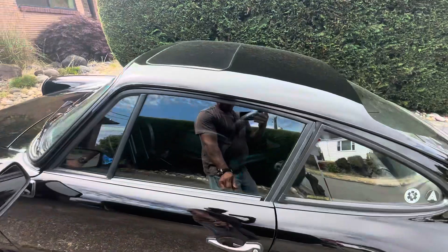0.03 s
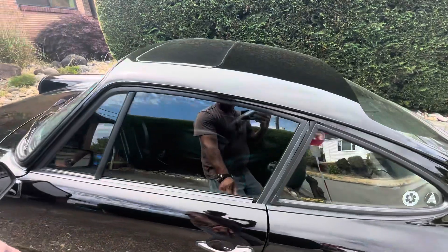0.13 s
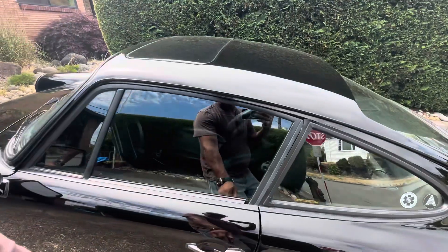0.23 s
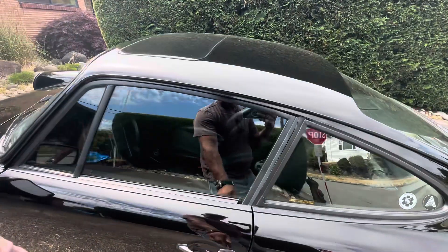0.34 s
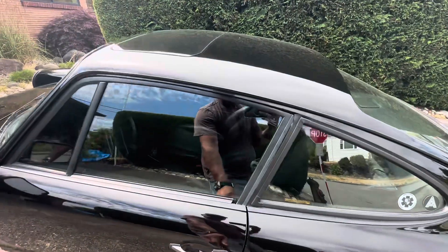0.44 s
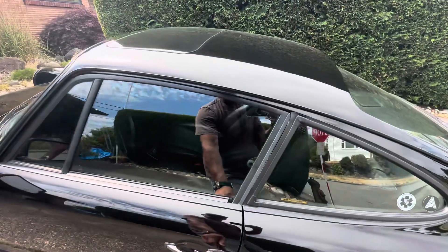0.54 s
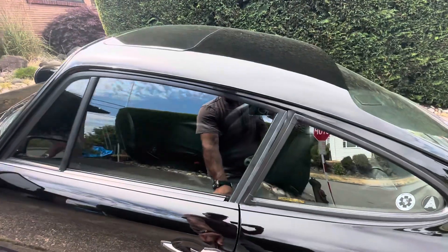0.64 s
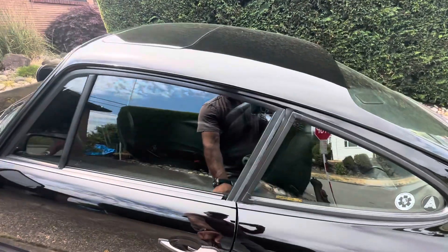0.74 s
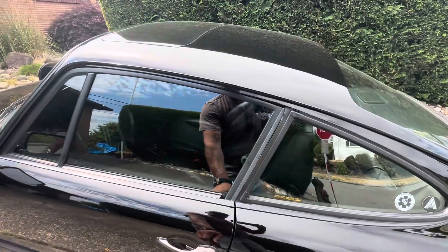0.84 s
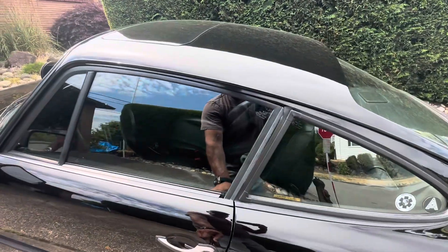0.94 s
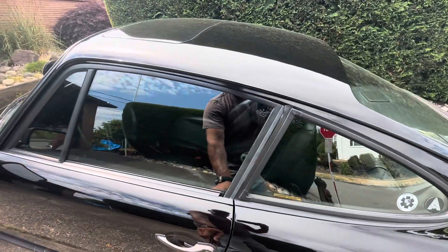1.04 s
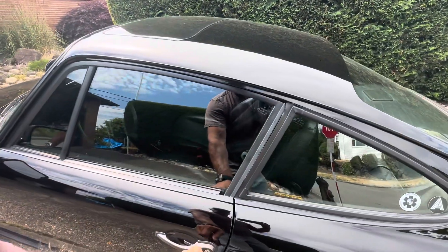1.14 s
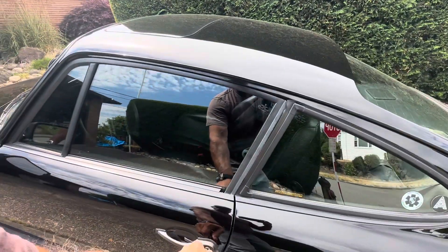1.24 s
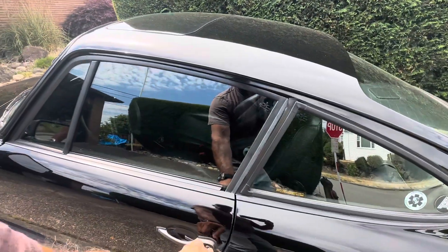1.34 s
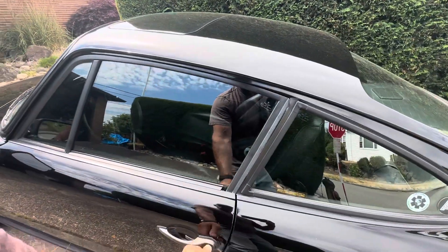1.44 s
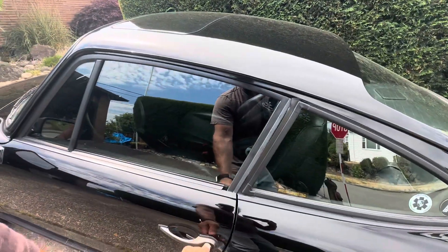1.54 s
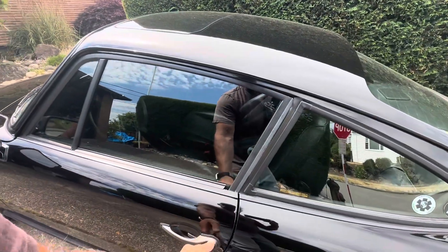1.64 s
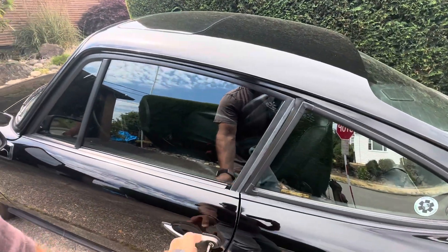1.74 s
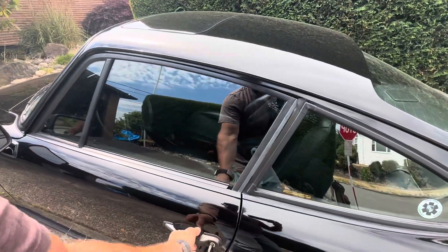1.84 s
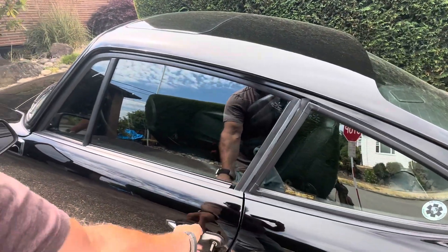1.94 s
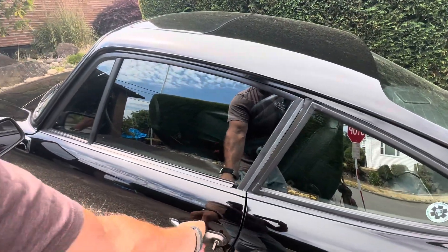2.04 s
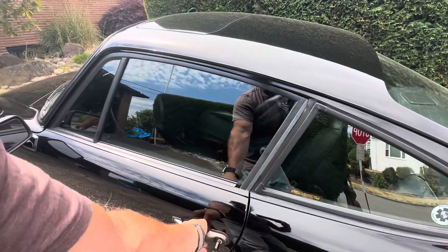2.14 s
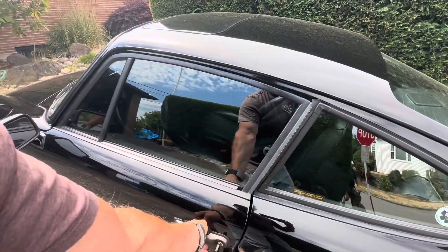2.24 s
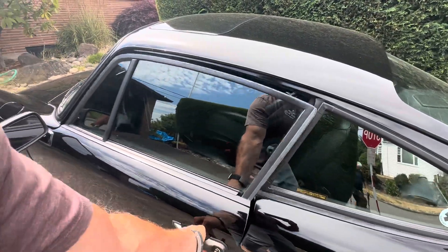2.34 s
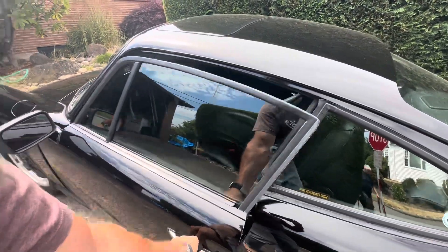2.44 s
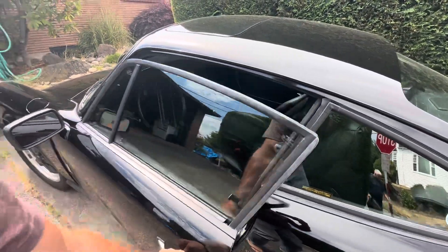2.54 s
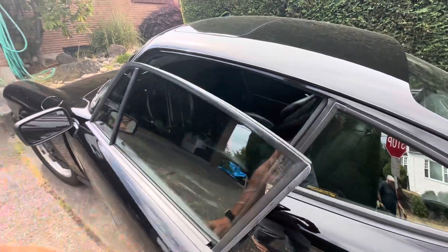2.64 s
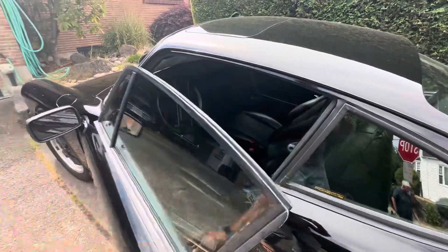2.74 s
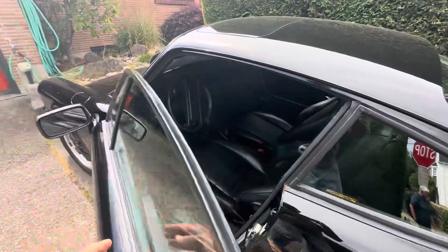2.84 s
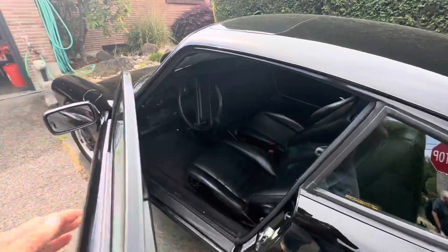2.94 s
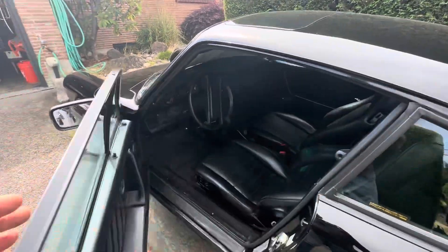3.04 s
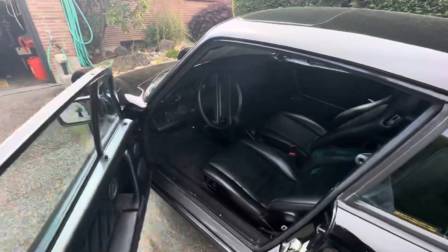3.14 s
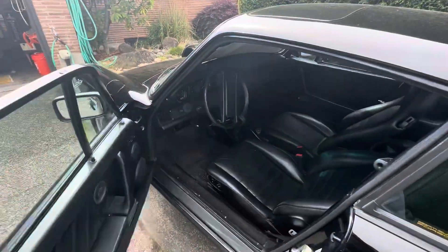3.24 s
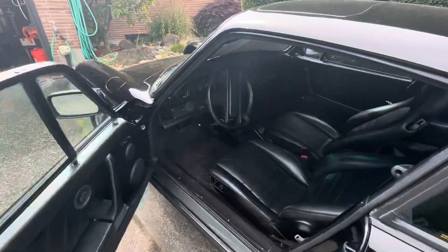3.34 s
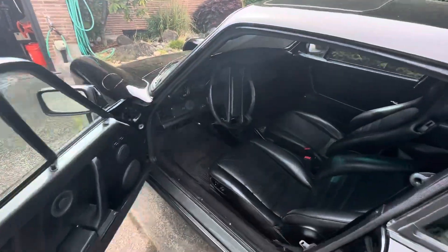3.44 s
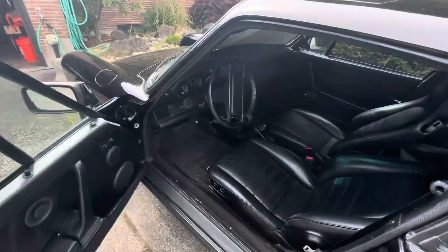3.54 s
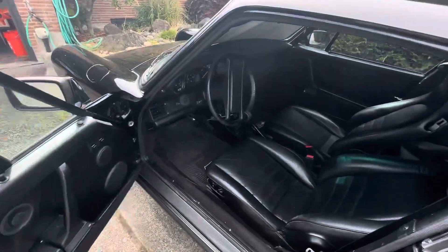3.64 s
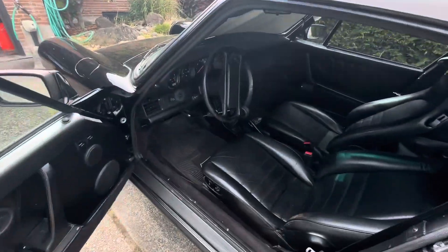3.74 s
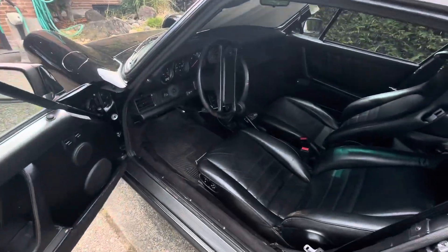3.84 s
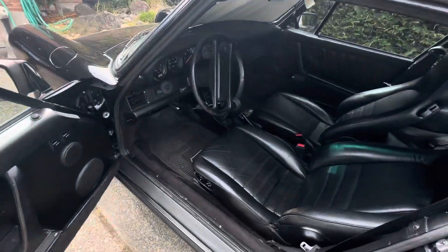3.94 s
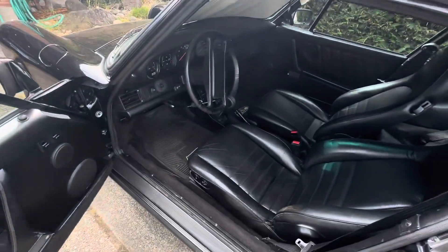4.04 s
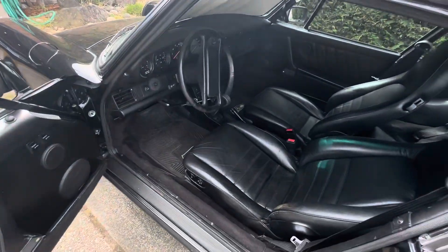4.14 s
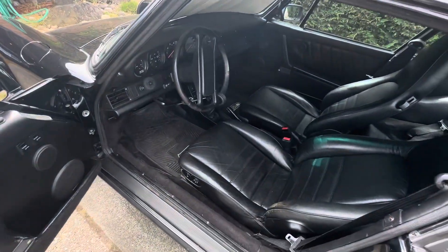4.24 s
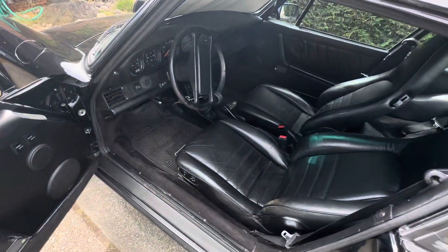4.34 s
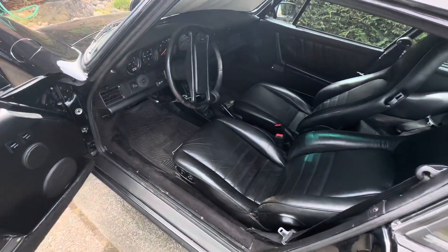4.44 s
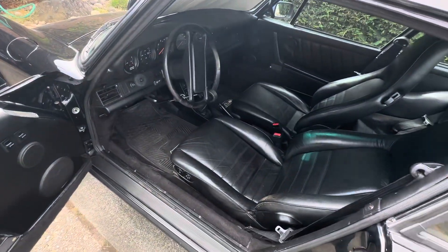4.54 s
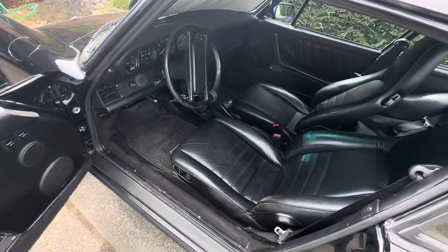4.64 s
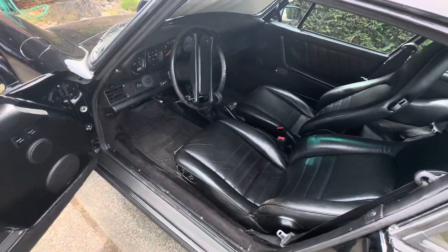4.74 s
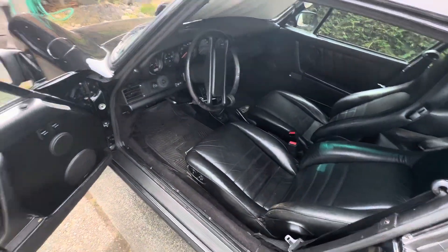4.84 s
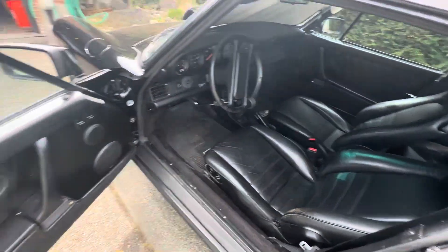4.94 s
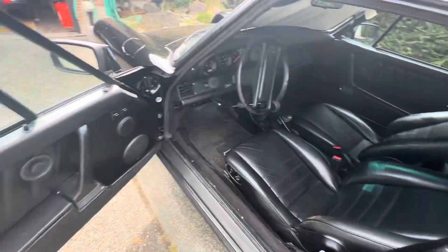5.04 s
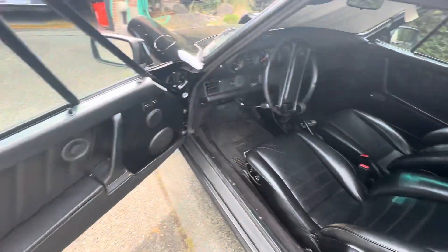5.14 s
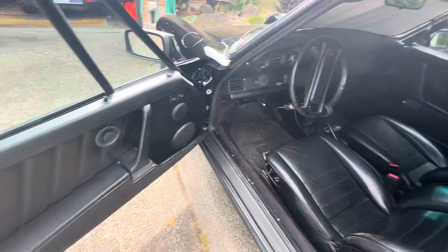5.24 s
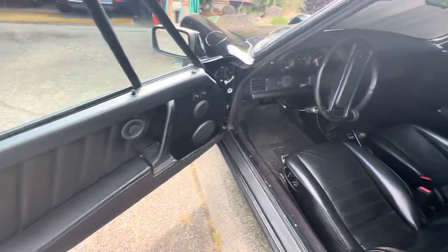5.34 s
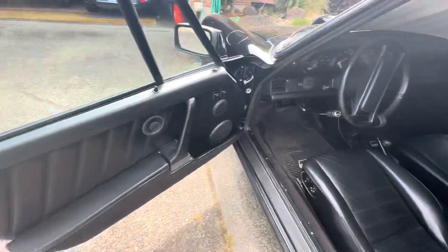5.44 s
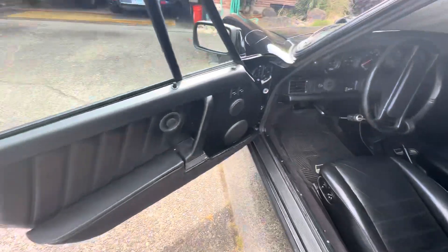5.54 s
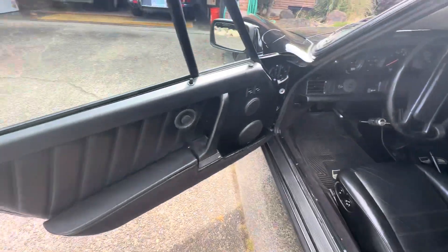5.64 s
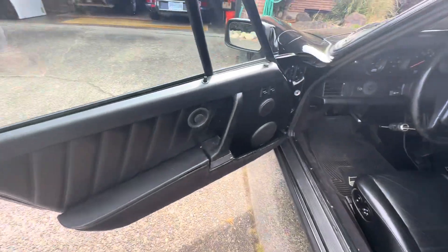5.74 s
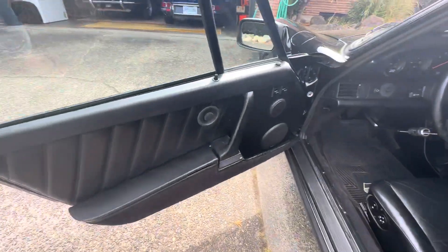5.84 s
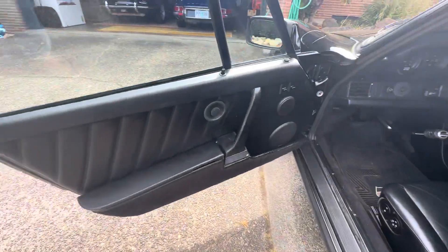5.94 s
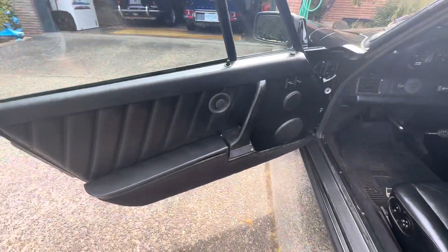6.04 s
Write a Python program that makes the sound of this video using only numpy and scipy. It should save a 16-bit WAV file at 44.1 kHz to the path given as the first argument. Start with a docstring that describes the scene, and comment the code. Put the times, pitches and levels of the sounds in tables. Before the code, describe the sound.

Close to the microphone on a driveway, someone works the lock of an old car's door: a busy string of metallic clicks and knocks with a light jingle of keys. The rubber seal lets go with a low pop, and the door clicks and then clunks through two stops as it opens. Afterwards come a faint creak and shoes shuffling on grit, with far traffic rumbling softly throughout.

```python
"""Shoes scuff on gritty concrete over a rumble of distant traffic and a faint, brief whistle.
At arm's length an old sports car's door is opened: keys ping, the lock slides and clashes, the latch
lets go and the seal pops. The door swings through two notches of its stay; a faint creak follows.
Impacts excite the damped modes of the steel and the door panel, while stick-slip friction drives
the resonances of the soles, lock, stay and creak."""
import sys
import numpy as np
from scipy import signal
from scipy.io import wavfile

SR = 44100
rng = np.random.default_rng(int(sys.argv[2]) if len(sys.argv) > 2 else 0)


def output_pcm(signal):
    """Save a mono or channel-first signal as 16-bit PCM at the path in sys.argv[1].

    Samples are clipped to [-1, 1] before scaling.
    """
    pcm = np.clip(np.atleast_2d(signal).T, -1, 1) * 32767
    wavfile.write(sys.argv[1], SR, np.round(pcm).astype(np.int16))


N = 268128
TIME = np.arange(N) / SR
AGE = np.arange(int(.4 * SR)) / SR   # time since an impact

# edges of the thump, knock, clack, click and tick registers: f/Hz
REGISTER_EDGES = [40, 220, 900, 3000, 8000, 17000]
# left-right coherence of noise: f/Hz, coherence (0-1)
COHERENCE = [(30, .62), (70, .77), (130, .87), (400, .68), (900, .25), (2000, 0), (16000, 0)]
# outdoor noise spectrum: f/Hz, relative density/dB
OUTDOOR_SPECTRUM = [(15, -35), (25, 0.5), (92, 3), (161, -8), (463, -23.5), (677, -21), (911, -27.5),
                    (1440, -27.5), (1740, -30.5), (2220, -27.5), (3340, -58.5), (3920, -38.5), (8360, -45),
                    (11500, -57), (14400, -63.5), (16000, -75)]
# outdoor rumble: t/s, level/dB
RUMBLE_LEVEL = [(0, -46.5), (2.4, -48), (4.1, -48.5), (4.5, -46.5), (5.0, -48.5), (5.6, -44.5)]

# grit cracking underfoot: t/s, t60/s, level/dB, tilt/dB per register
GRIT_CRACKS = [(0.015, 0.018, -47, 0.5), (0.0754, 0.03, -51.5, -12.5), (0.5034, 0.039, -54, 4),
               (0.6954, 0.05, -41.5, -2), (3.3274, 0.11, -41, 4), (3.466, 0.012, -56, -3.5),
               (3.6278, .03, -52, -3.5), (4.161, .03, -63.5, -10), (4.398, 0.012, -63, 13),
               (4.845, 0.063, -49, 1), (5.261, 0.058, -47.5, -0.5), (5.323, 0.0066, -61, 12),
               (5.362, 0.052, -50, -3.5), (5.4639, 0.043, -48.5, 5), (5.832, 0.12, -60.5, -14),
               (5.872, 0.028, -51.5, -8.5)]
# drags of a sole: t/s, length/s, level/dB, treble gain/dB
SCUFFS = [(0.0, 0.15, -73, 12.5), (0.266, 0.12, -49, -2), (0.682, .14, -61, 1), (3.317, 0.16, -62, 2.5),
          (3.474, 0.23, -58, -2), (3.926, 0.063, -41, -2.5), (3.952, 0.11, -56, -12),
          (4.067, 0.071, -60, 2.5), (4.82, 0.12, -65, -1), (5.147, 0.29, -54.5, 2),
          (5.284, 0.12, -58.5, -8), (5.416, 0.085, -54, -4), (5.494, 0.077, -53.5, -6),
          (5.75, 1, -55, -2.5)]
# their spectrum: f/Hz, relative density/dB
SCUFF_SPECTRUM = [(290, -32.5), (500, -10), (919, -5), (1400, -4), (1750, -8.5), (2400, -10.5), (3300, -8),
                  (6000, -8.5), (9360, -15.5), (14200, -25.5), (16000, -29)]
# grit under a sole: f/Hz, bandwidth/Hz, relative level/dB
SOLE_RESONANCES = [(1290, 280, -8), (1930, 100, -6.5), (2220, 83, -2), (4300, 400, -8.5), (5600, 140, -6.5),
                   (8650, 370, -6.5)]
# a sole catching: t/s, length/s, level/dB, centre f/Hz
SOLE_CATCHES = [(0.302, 0.077, -48, 2180), (3.937, 0.046, -41, 1530), (5.193, 0.023, -51, 1690),
                (5.273, .018, -50, 2920), (5.32, 0.066, -47.5, 2300), (5.348, .026, -45.5, 1810),
                (5.386, 0.025, -48.5, 1420), (5.445, 0.025, -48, 1930), (5.5, 0.047, -56, 1920),
                (5.745, 0.074, -65.5, 2180)]

# slowing of the creak: t/s, rate/slips per s
CREAK_RATE = [(4.2, 90), (4.3, 69), (4.4, 52), (4.47, 35), (4.495, 13), (4.555, 13)]
# modes struck by each slip: f/Hz, relative level/dB, t60/s
SLIP_MODES = [(808, -8, 0.05), (1400, -11, 0.012), (1850, -11, .015), (2340, -0.5, 0.034),
              (2600, -1, 0.012), (3450, -4, 0.009), (4150, -5, .011), (5930, -15, 0.01), (7450, -13, 0.012)]
# the creak's rasp and closing squeal: f/Hz, bandwidth/Hz, relative level/dB
RASP_RESONANCES = [(756, 130, 8), (2280, 300, 4), (4230, 380, -7), (6000, 420, -7)]
SQUEAL_RESONANCES = [(2320, 150, -0.5), (4200, 260, -8), (6050, 110, -10), (7750, 160, -8), (9240, 800, -5),
                     (12300, 900, -7)]

# pushes of the hand on handle and lock: t/s, length/s, hiss/dB, steel/dB, panel drone/dB
HAND_PUSHES = [(0.996, 0.25, -62, -56.5, -50), (1.361, 0.3, -53, -69.5, -48),
               (1.604, 0.18, -42.5, -41, -44), (1.803, 0.13, -51.5, -55.5, -52),
               (1.943, 0.12, -40.5, -50.5, -47.5), (2.115, 0.25, -44.5, -64, -53)]
# friction of the swinging door: t/s, level/dB
SWING_LEVEL = [(2.35, -59), (2.52, -55.5), (2.68, -48), (2.85, -47), (2.98, -53.5), (3.25, -56),
               (3.4, -57.5)]
# hiss of sliding and drone of the door panel: f/Hz, relative density/dB
SLIDE_SPECTRUM = [(410, 2), (700, -11), (1180, 2.5), (1680, -5), (4260, -4), (7590, -14), (9480, -6.5),
                  (11700, -14), (12600, -16), (13700, -4), (16000, -10)]
PANEL_SPECTRUM = [(90, 2.5), (180, -0.5), (290, 7.5), (400, 5.5), (600, -1), (900, -7), (1800, -20)]
# lock steel, sliding stay and struck stay: f/Hz, bandwidth/Hz, relative level/dB
LOCK_RESONANCES = [(4300, 150, -13.5), (5220, 240, -17), (6130, 110, -1.5), (7280, 79, -8),
                   (9530, 150, -0.5), (13830, 210, 7), (15340, 660, -13.5)]
STAY_SLIDE_RESONANCES = [(1523, 1800, 2.5), (4230, 280, -8.5), (5910, 1400, 2.5), (7230, 130, -9),
                         (8300, 82, -2.5), (9040, 78, -5.5), (9000, 56, -22), (14100, 1100, -19)]
STAY_HIT_RESONANCES = [(1164, 46, 1.5), (1420, 41, -1), (2075, 60, -8), (2300, 200, -3.5),
                       (4060, 130, -4.5), (4466, 140, -3), (5350, 160, -9), (6060, 120, 1), (6570, 90, -10),
                       (8650, 240, -9.5), (9100, 150, -3)]
# loose parts ticking as the door moves: t/s, t60/s, level/dB, tilt/dB per register
LOOSE_PARTS = [(0.9725, .012, -61, 11), (1.0125, .012, -66, 5), (1.053, 0.011, -56.5, 5),
               (1.095, 0.01, -49, 3.5), (1.591, 0.012, -49, -4), (1.612, 0.019, -51, -6),
               (1.695, .03, -45, 5), (1.914, 0.013, -57, 10), (1.952, .012, -53.5, 12),
               (2.051, .015, -72.5, -8), (2.3864, 0.0094, -57, -9), (2.5002, 0.026, -71, 15.5),
               (3.0644, .025, -62, -8), (3.7265, 0.12, -45, -3.5)]
# slips in the hinge: t/s, peak level/dB
HINGE_SLIPS = [(2.901, -30), (2.907, -27), (2.920, -37.5), (2.926, -30.5)]
# keys touching at the lock: t/s, level/dB
KEY_TOUCHES = [(1.025, -58), (1.145, -53), (1.573, -53), (1.672, -43), (1.778, -50), (2.022, -50)]
# modes of the keys: f/Hz, relative level/dB
KEY_PARTIALS = [(6100, -6), (6980, -1), (8100, -5), (9580, -8), (13650, 4), (14100, -7)]
# cabin air as the seal lets go: t/s, f/Hz, level/dB, t60/s
CABIN_BOOM = [(2.176, 61, -17, 0.17)]
# door shell, skin and lock steel: f/Hz, relative level/dB, t60/s before added damping
BODY_MODES = [(65, -3, 0.48), (78.3, -2.5, 0.78), (129, -6, 0.14), (205.2, -3.5, 0.33), (279, 1, 0.1),
              (347.7, -7.5, 0.37), (373.8, -6, 0.38), (510, -13, 0.39), (547, -9, 0.13), (609, 7.5, 0.07),
              (715, 6, .07), (731.5, -12, 0.17), (824, -14.5, 0.25), (1116, 6, 0.092), (1433, -14, 0.032),
              (1530, -10, 0.13), (2160, 0, 0.13), (2303, 4, 0.096), (2550, -23, 0.09), (2480, -9, 0.28),
              (3870, 0.5, 0.049), (4400, 0, 0.047), (4480, 4.5, 0.052), (5070, 4.5, 0.036),
              (5960, 0, 0.035), (6830, 5, 0.04), (8800, -0.5, 0.037), (9330, 1.5, 0.073),
              (13000, 22, 0.008), (14600, -23.5, 0.037)]
# impacts of handle, lock and latch, and of the stay jumping its notches and rebounding:
# t/s, chatter t60/s, knock f/Hz, thump/dB, knock/dB, clack/dB, steel/dB, steel tilt/dB per register
LOCK_IMPACTS = [(0.978, 0.025, 405, -37.5, -40, -48, -55, -12), (1.023, 0.04, 385, -36, -49, -55, -53, 8.5),
                (1.121, 0.028, 395, -32.5, -37.5, -43.5, -52, -11),
                (1.142, 0.033, 368, -42, -44, -58, -52.5, 16),
                (1.184, 0.052, 478, -41.5, -37.5, -38.5, -51, -10),
                (1.273, 0.015, 398, -39, -43.5, -63, -46.5, -3),
                (1.394, 0.013, 370, -50, -62, -67, -42.5, -5.5),
                (1.404, 0.073, 378, -38, -36, -59, -46, -12),
                (1.4495, 0.022, 554, -47, -25.5, -33, -42, -9),
                (1.462, 0.095, 362, -31, -28.5, -40, -44, -8.5),
                (1.484, 0.073, 436, -32, -32, -35.5, -42, -12),
                (1.4925, 0.026, 582, -43, -14, -26, -28.5, 7),
                (1.5055, 0.034, 388, -25, -23.5, -34.5, -42.5, -12),
                (1.523, 0.07, 290, -26.5, -30.5, -48, -48, -4),
                (1.626, 0.016, 480, -50, -21, -34.5, -39.5, -7),
                (1.6345, 0.034, 472, -53, -24, -31.5, -49, 3), (1.6544, 0.034, 513, -60, -34, -58, -35, 5),
                (1.671, 0.14, 410, -42, -44, -57, -33, 10), (1.7284, 0.0084, 380, -41, -63, -66, -32.5, 6),
                (1.7412, 0.041, 697, -51, -25, -27.5, -31, 0.5), (1.778, 0.062, 400, -54, -56, -63, -41, 7),
                (1.8335, 0.026, 364, -55, -44.5, -46, -48.5, 6),
                (1.9682, 0.046, 520, -63, -45, -44, -37.5, -7),
                (1.9739, 0.039, 405, -55, -29, -31.5, -33, 1), (2.023, 0.039, 412, -37, -35, -42, -46, -9),
                (2.102, 0.017, 350, -63, -49, -71, -50, 2.5), (2.169, 0.27, 354, -22.5, -30, -40, -45, -13),
                (2.2065, 0.045, 265, -45, -53, -43, -32, -1),
                (2.2207, 0.041, 363, -26, -29.5, -33, -46, -15.5),
                (2.2577, 0.017, 647, -41, -32.5, -32.5, -23, -1.5),
                (2.2737, 0.021, 610, -58, -34, -39, -36.5, 0),
                (2.311, 0.029, 494, -53, -39.5, -41.5, -32, 0.5)]
STAY_IMPACTS = [(2.6346, 0.033, 410, -65, -57, -55, -27.5, 1),
                (2.640, 0.029, 337, -46, -30, -41.5, -44, -2),
                (2.6545, 0.027, 335, -54, -36, -57, -42, -5.5),
                (3.7398, 0.029, 705, -28, -21, -27.5, -18.5, -3.5),
                (3.754, 0.042, 286, -32.5, -30.5, -31, -33, -2.5),
                (3.8490, 0.036, 666, -53, -38.5, -39, -39.5, -4.5),
                (3.8595, 0.089, 608, -54, -39, -42, -46.5, -4),
                (3.8991, 0.063, 297, -57, -58, -65, -50.5, -3)]


def from_db(db):
    """Amplitude ratio of a level in decibels."""
    return 10 ** (np.asarray(db) / 20)


def rms_one(x):
    """Normalisation to rms 1."""
    return x / np.sqrt(np.mean(x ** 2) + 1e-20)


def in_time(curve):
    """Linear interpolation of a curve over time."""
    return np.interp(TIME, *np.transpose(curve))


def at_hz(points, hz):
    """Interpolation on a log-frequency axis."""
    freqs, values = np.transpose(points)
    return np.interp(np.log(hz), np.log(freqs), values)


def filtered(x, hz, kind, order):
    """Causal, maximally flat filter."""
    return signal.sosfilt(signal.butter(order, hz, kind, fs=SR, output="sos"), x + 1e-18)


def band(x, low, high, order=2):
    """Band-pass between two frequencies in Hz."""
    return filtered(x, [low, min(high, .45 * SR)], "band", order)


def decay(t60):
    """Exponential damping: 60 dB in t60 seconds."""
    return np.exp(-np.log(1000) * np.minimum(AGE / t60, 10))


def onset(rise_s):
    """Smooth build-up of a vibration."""
    return 1 - np.exp(-(AGE / rise_s) ** 2)


def swell(s, length_s, edge=1):
    """Half-sine envelope; a smaller edge steepens its ends."""
    return np.abs(np.sin(np.pi * np.clip((TIME - s) / length_s, 0, 1))) ** edge


def add(track, s, sound):
    """Superposition of a sound at time s."""
    at = max(round(s * SR), 0)
    track[..., at:at + sound.shape[-1]] += sound[..., :N - at]


def drift(hz):
    """Low-passed random fluctuation with a spread of 1."""
    knot_hz = 200
    knots = rng.standard_normal(int(N / SR * knot_hz) + 400)
    pole = np.exp(-2 * np.pi * hz / knot_hz)
    slow = rms_one(signal.lfilter([1], [1, -2 * pole, pole * pole], knots)[398:])
    return np.interp(TIME * knot_hz, np.arange(len(slow)), slow)


def coloured_noise(spectrum, flicker_db, grain_db):
    """Partly coherent stereo noise in independently modulated half-octave bands; rms 1."""
    out, edges = 0, 22 * 2 ** np.arange(0, 10, .5)
    grains = from_db(grain_db * np.minimum(rng.exponential(1, N // 8 + 1), 6)).repeat(8)[:N]
    white = rng.standard_normal((2, 2, N)) * grains
    for k, (low, high) in enumerate(zip(edges, edges[1:])):
        hz = np.sqrt(low * high)
        if hz < spectrum[0][0] / 2:
            continue
        mid, side = band(white[k % 2], low, high)
        coherence = at_hz(COHERENCE, hz)
        gain = from_db(at_hz(spectrum, hz) + flicker_db * drift(11))
        out += gain * (np.sqrt(1 + coherence) * mid + np.sqrt(1 - coherence) * side * [[1], [-1]])
    return rms_one(out)


def resonate(x, resonances):
    """Forced response of parallel two-pole resonators; rms 1."""
    out = 0
    for hz, width_hz, db in resonances:
        radius = np.exp(-np.pi * width_hz / SR)
        poles = [1, -2 * radius * np.cos(2 * np.pi * hz / SR), radius * radius]
        out += from_db(db) * rms_one(signal.lfilter([1, 0, -1], poles, x + 1e-18))
    return rms_one(out)


def rubbing(resonances, slips_per_s, spread_db):
    """Friction: tiny random slips excite a body's resonances; rms 1."""
    slips = rng.random(N) < slips_per_s / SR
    sizes = from_db(spread_db * np.minimum(rng.exponential(1, N), 3))
    return resonate(slips * sizes * np.clip(rng.standard_normal((2, N)), -1.5, 1.5), resonances)


def catches(per_s, t60, steady_db):
    """Stick-slip envelope: uneven jumps relax towards a steady floor; rms 1."""
    at = np.cumsum(rng.uniform(.3, 1.7, int(2 * per_s * N / SR))) * SR / per_s
    at = at[at < N].astype(int)
    jumps = np.zeros(N)
    jumps[at] = from_db(rng.uniform(-12, 0, len(at)))
    relaxing = signal.lfilter([1], [1, -from_db(-60 / (t60 * SR))], jumps)
    return rms_one(from_db(steady_db) + rms_one(relaxing))


def chatter(t60, tail_db, tail_t60, grain_db, rise_fraction):
    """Contact noise: a crowd of micro-impacts decays into a faint tail."""
    grain_sizes = np.clip(rng.standard_normal(len(AGE) // 32 + 1), -2, 2)
    grains = from_db(grain_db * grain_sizes).repeat(32)[:len(AGE)]
    envelope = grains * decay(t60) + from_db(tail_db) * decay(tail_t60)
    return rng.standard_normal((2, len(AGE))) * onset(rise_fraction * t60) * envelope


def at_energy(x, db):
    """Equal energy: scale a transient to match 10 ms of sound at level db."""
    return from_db(db) * np.sqrt(.01 / AGE[-1]) * rms_one(x)


def burst(x, register, db):
    """An impact band-limited to one register."""
    return at_energy(band(x, *REGISTER_EDGES[register:register + 2], order=3), db)


def arched(x, registers, db, tilt_db, arch_db):
    """Spectral envelope of an impact: a tilted parabola across registers."""
    steps = np.array(registers) - np.mean(registers)
    return sum(burst(x, register, db + tilt_db * k - arch_db * k * k)
               for register, k in zip(registers, steps))


def driveway(x, wet_db, t60, top_hz):
    """Diffuse reflection from the ground, the car and the house front joins the direct sound."""
    scatter = band(rng.standard_normal((2, len(AGE))), 120, top_hz, order=1) * onset(.0044) * decay(t60)
    scatter /= np.sqrt(np.sum(scatter ** 2, axis=1, keepdims=True))
    return x + from_db(wet_db) * signal.fftconvolve(x, scatter, axes=1)[:, :N]


def traffic(hum_db=-54.5, fade_db_per_s=2.5):
    """Outdoor rumble, and a hum of far traffic that weakens with distance as it recedes."""
    rumble = from_db(in_time(RUMBLE_LEVEL)) * coloured_noise(OUTDOOR_SPECTRUM, 2.5, grain_db=0)
    hum = rms_one(band(rng.standard_normal(N) + 1.1 * rng.standard_normal((2, N)), 210, 420))
    return rumble + from_db(hum_db - fade_db_per_s * TIME) * hum


def whistle(hz=1810, db=-67):
    """A far tone with a weak octave, randomly modulated in pitch and level, highest in its middle."""
    arc = swell(.5, length_s=.46, edge=.4)
    pitch = hz * (1 - .08 * (1 - arc) + .014 * drift(40))
    phase = 2 * np.pi * np.cumsum(pitch) / SR
    flicker = .75 + .65 * drift(35)
    return from_db(db) * arc * flicker * (np.sin(phase) + from_db(-17) * np.sin(2 * phase))


def dry_contacts(rows):
    """Brief contacts of grit or loose parts radiate broadband cracks with no ring."""
    out = np.zeros((2, N))
    for s, t60, db, tilt_db in rows:
        crack = chatter(t60, tail_db=-12.5, tail_t60=.22, grain_db=-1.5, rise_fraction=.011)
        add(out, s, arched(crack, (1, 2, 3, 4), db, tilt_db, arch_db=3.5))
    return out


def shoes(treble_hz=2850):
    """Sliding friction: each drag of a sole swells and stops, crunching grit in clumps."""
    drag = coloured_noise(SCUFF_SPECTRUM, flicker_db=2.5, grain_db=2)
    crunch = rubbing(SOLE_RESONANCES, slips_per_s=1000, spread_db=4.2)
    clumps = catches(per_s=110, t60=.022, steady_db=-6)
    scrape = clumps * (from_db(1.5) * drag + from_db(-2) * crunch)
    dull, bright = (filtered(scrape, treble_hz, kind, order=3) for kind in ("low", "high"))
    return sum(from_db(db) * swell(s, length_s) * (dull + from_db(treble_db) * bright)
               for s, length_s, db, treble_db in SCUFFS)


def sole_rasps(band_ratio=1.26):
    """Rolling contact: grit under a sole makes short, grainy bands of noise."""
    grains = rng.standard_normal((2, N)) * catches(per_s=260, t60=.009, steady_db=-14)
    out = np.zeros((2, N))
    for s, length_s, db, hz in SOLE_CATCHES:
        rolling = rms_one(band(grains, hz / band_ratio, hz * band_ratio))
        out += from_db(db) * swell(s, length_s, edge=.87) * rolling
    return out


def creak(db=-50, rise_s=.1, sag_oct_per_s=.065):
    """Stick-slip: separate slips, coming ever more slowly, each strike a set of damped modes."""
    out = np.zeros((2, N))
    start, end = CREAK_RATE[0][0], CREAK_RATE[-1][0]
    rate = in_time(CREAK_RATE) * (TIME > start) * (TIME < end)
    slips_left = np.cumsum(rate[::-1])[::-1] / SR
    age = AGE[:SR // 10]
    for at in np.flatnonzero(np.diff(np.ceil(slips_left))):
        since = TIME[at] - start
        slip = 0
        for hz, mode_db, t60 in SLIP_MODES:
            pitch = hz * 2 ** (-sag_oct_per_s * since) * rng.normal(1, .008)
            phase = 2 * np.pi * (pitch * age + rng.random((2, 1)))
            slip += from_db(mode_db - 60 * age / t60) * np.sin(phase)
        add(out, TIME[at], from_db(db) * min(since / rise_s, 1) * slip)
    return driveway(out, wet_db=-12, t60=.16, top_hz=9000)


def creak_rasp(db=-60.5):
    """Surface friction: dense micro-slips roughen the creak."""
    rasp = rubbing(RASP_RESONANCES, slips_per_s=4400, spread_db=-1.5)
    return from_db(db) * swell(4.19, length_s=.44, edge=.31) * rasp


def squeal(s=4.43, db=-63.5, sag_oct_per_s=.32):
    """Rapid slips fuse into faint, flickering resonant tones that glide down."""
    speed = 2 ** (-sag_oct_per_s * np.maximum(TIME - s, 0))
    ringing = rubbing(SQUEAL_RESONANCES, slips_per_s=2900, spread_db=2)
    tones = np.array([np.interp(np.cumsum(speed) / SR, TIME, x) for x in ringing])
    return from_db(db + 2.7 * drift(20)) * swell(s, length_s=.41, edge=.27) * tones


def push(s, length_s, attack_s=.039, release_t60=.22):
    """The hand's force rises linearly, holds and decays exponentially."""
    release = from_db(-60 * np.clip((TIME - s - length_s) / release_t60, 0, 2))
    return np.clip((TIME - s) / attack_s, 0, 1) * release


def door_friction():
    """Sliding friction in the lock and in the stay's guide forces the panel to drone."""
    sliding, ringing, pressing = sum(from_db(levels_db)[:, None] * push(s, length_s)
                                     for s, length_s, *levels_db in HAND_PUSHES)
    swing = from_db(in_time(SWING_LEVEL)) * (TIME > SWING_LEVEL[0][0]) * (TIME < SWING_LEVEL[-1][0])
    hiss = coloured_noise(SLIDE_SPECTRUM, flicker_db=3, grain_db=3)
    catching = catches(per_s=45, t60=.06, steady_db=-4)
    steel = rubbing(LOCK_RESONANCES, slips_per_s=700, spread_db=2.5)
    lock = catching * (from_db(-4.5) * sliding * hiss + from_db(-2) * ringing * steel)
    guide = band(rubbing(STAY_SLIDE_RESONANCES, slips_per_s=8100, spread_db=-8), 200, 10300, order=4)
    stay = swing * (from_db(-17) * swing / swing.max() * hiss + from_db(-6.5) * guide)
    to_left = from_db([[2], [-2]])
    drone = to_left * coloured_noise(PANEL_SPECTRUM, flicker_db=3, grain_db=3.5)
    return lock + stay + (pressing + from_db(-3) * swing) * drone


def hinge_ticks():
    """Heavily damped slips in the hinge give dull ticks."""
    out = np.zeros((2, N))
    for s, db in HINGE_SLIPS:
        envelope = decay(.005) + from_db(-24) * decay(.1)
        tick = band(rng.standard_normal((2, len(AGE))) * envelope, 1180, 1950, order=3)
        add(out, s, from_db(db) * tick / np.abs(tick).max())
    return out


def keys(t60=.2):
    """Free vibration: each touch strikes the keys' high modes with new strengths."""
    out = np.zeros((2, N))
    for s, db in KEY_TOUCHES:
        ring = 0
        for hz, mode_db in KEY_PARTIALS:
            strength = from_db(mode_db + rng.uniform(-4, 4))
            ring += strength * np.sin(2 * np.pi * (hz * AGE + rng.random((2, 1))))
        add(out, s, from_db(db) * ring * decay(t60))
    return out


def seal():
    """Cavity resonance: the cabin air booms as the door leaves its rubber."""
    out = np.zeros((2, N))
    for s, hz, db, t60 in CABIN_BOOM:
        add(out, s, from_db(db) * np.sin(2 * np.pi * hz * AGE) * onset(.0037) * decay(t60))
    return out


def part_ring(t60, low_hz=992.5, high_hz=14720, count=16):
    """A small struck steel part rings briefly in inharmonic modes of its own."""
    hz = low_hz * (high_hz / low_hz) ** ((np.arange(count) + rng.random(count)) / count)
    phases = rng.random((2, count, 1))
    return np.sin(2 * np.pi * (hz[:, None] * AGE + phases)).sum(axis=1) * decay(t60) * onset(.009)


def housing_clack(chatter_t60):
    """The broad, hollow resonance of the latch housing outlasts the chatter."""
    blow = rng.standard_normal((2, len(AGE))) * onset(.0011) * decay(1.35 * chatter_t60)
    return band(blow, 680, 1450)


def skin_knock(hz, t60, ringing, contact, stretch=.076, settle_s=.0035):
    """Nonlinear flexure: the hard-driven skin starts sharp and settles; nearby modes carry on."""
    cycles = np.cumsum(hz * (1 + stretch * np.exp(-AGE / settle_s))) / SR
    flex = np.sin(2 * np.pi * cycles) * onset(.0011) * decay(1.1 * t60)
    nearby = band(ringing, .73 * hz, 1.26 * hz)
    return rms_one(flex) + rms_one(nearby) + from_db(-.5) * rms_one(band(contact, 180, 990))


def shell_thump(knock_hz, strengths, modes, shudder_low_hz):
    """Modal excitation: a harder contact reaches higher shell modes, over a noisy shudder."""
    reach = np.exp(-np.log2(np.array(BODY_MODES)[:, 0] / (.3 * knock_hz)) ** 2)
    shell = ((strengths * reach) @ modes).real * onset(.012)
    shudder = band(rng.standard_normal(len(AGE)), shudder_low_hz, 520) * onset(.0028) * decay(.14)
    return rms_one(shell) + from_db(4) * rms_one(shudder)


def from_left(x, lag_s, pan_db):
    """Time and level differences: a source on the left is earlier and louder there."""
    delayed = np.interp(AGE - lag_s, AGE, x, left=0)
    return np.array([x * from_db(pan_db), delayed * from_db(-pan_db)])


def door_impacts(rows, resonances, resonance_db, body_db, tail_db, shudder_low_hz, lag_s, pan_db):
    """Structural coupling: steel parts clash, then housing, skin and shell clack, knock and thump."""
    out = np.zeros((2, N))
    trim_t60, grease_t60 = .42, .13   # trim and hand damp all modes; grease and springs, the steel
    skin_delay_s = .001985
    modes = decay(trim_t60) * np.array([from_db(db) * decay(t60) * np.exp(2j * np.pi * hz * AGE)
                                        for hz, db, t60 in BODY_MODES])
    for s, t60, knock_hz, thump_db, knock_db, clack_db, steel_db, tilt_db in rows:
        sizes = from_db(2 * rng.standard_normal((2, len(modes))))
        strengths = sizes * np.exp(2j * np.pi * rng.random(sizes.shape))
        ringing = (strengths @ modes).real * onset(.0016)
        contact = chatter(t60, tail_db, tail_t60=.12, grain_db=3, rise_fraction=.06)
        steel = rms_one(contact) + from_db(-4) * rms_one(part_ring(t60))
        steel += from_db(resonance_db) * resonate(contact, resonances)
        steel += from_db(body_db) * rms_one(ringing * decay(grease_t60))
        knock = burst(skin_knock(knock_hz, t60, ringing[0], contact[0]), 1, knock_db)
        thump = burst(shell_thump(knock_hz, strengths[1], modes, shudder_low_hz), 0, thump_db)
        clack = at_energy(housing_clack(t60), clack_db)
        add(out, s, arched(steel, (2, 3, 4), steel_db, tilt_db, arch_db=4.5))
        add(out, s + skin_delay_s, clack + from_left(knock, lag_s, pan_db) + thump)
    return out


def scene():
    """Superposition of door, feet, their reflections and the background."""
    lock = door_impacts(LOCK_IMPACTS, LOCK_RESONANCES, resonance_db=-21, body_db=-1, tail_db=-24,
                        shudder_low_hz=62, lag_s=.0004, pan_db=3.4)
    stay = door_impacts(STAY_IMPACTS, STAY_HIT_RESONANCES, resonance_db=-5, body_db=-17, tail_db=-36,
                        shudder_low_hz=125, lag_s=.00024, pan_db=1.6)
    door = lock + stay + keys() + seal() + hinge_ticks() + dry_contacts(LOOSE_PARTS) + door_friction()
    feet = shoes() + dry_contacts(GRIT_CRACKS) + sole_rasps()
    near = driveway(door + feet, wet_db=-19.5, t60=.21, top_hz=5780)
    return near + creak() + creak_rasp() + squeal() + traffic() + whistle()


def record(dry, widening=.075, notch_db=-17, cutoff_hz=15900):
    """Microphone response: thin deep bass, wider midrange, a treble notch straight ahead, a cut top."""
    left, right = filtered(dry, 44, "high", order=3)
    mid, side = (left + right) / 2, (left - right) / 2
    mid -= widening * band(mid, 930, 2320, order=1)
    side += widening * band(side, 930, 2320, order=1)
    notched = filtered(mid, [10300, 12900], "bandstop", order=2)
    mid = notched + from_db(notch_db) * (mid - notched)
    side = filtered(side, 13000, "low", order=4)
    top_cut = signal.ellip(10, .3, 80, cutoff_hz, fs=SR, output="sos")
    return signal.sosfilt(top_cut, np.array([mid + side, mid - side]))


dry = scene()
out = record(dry)
output_pcm(out)
```